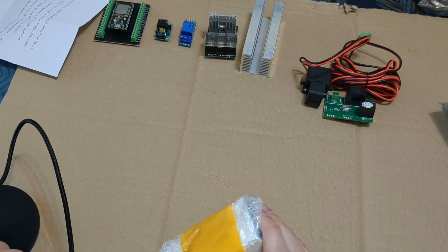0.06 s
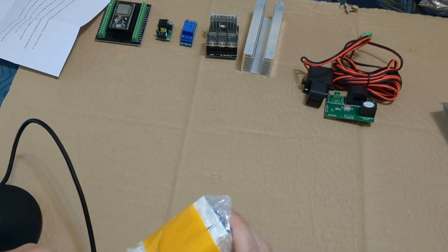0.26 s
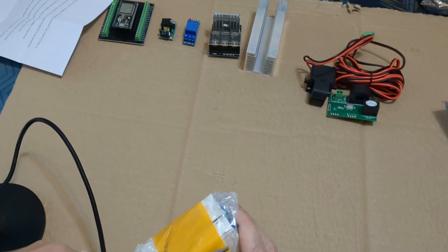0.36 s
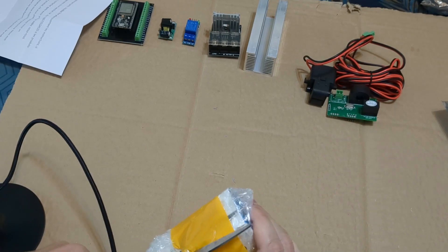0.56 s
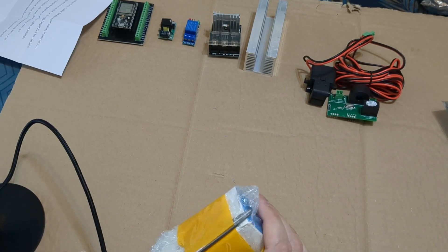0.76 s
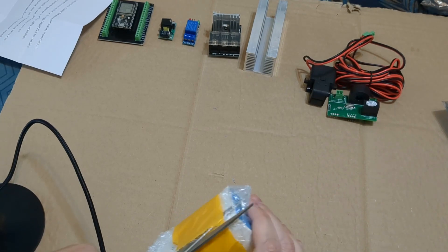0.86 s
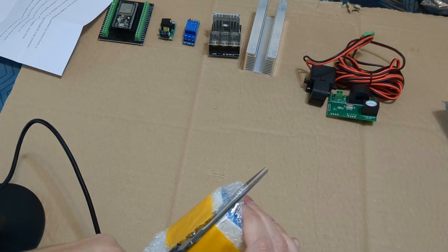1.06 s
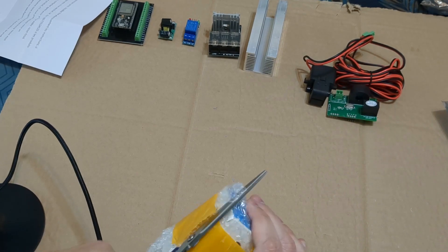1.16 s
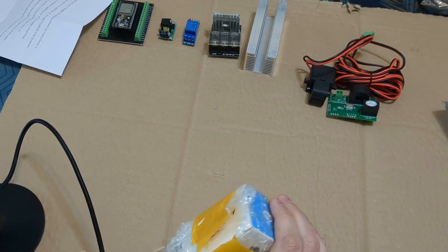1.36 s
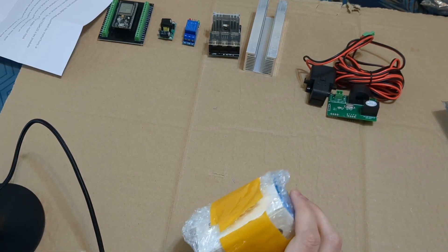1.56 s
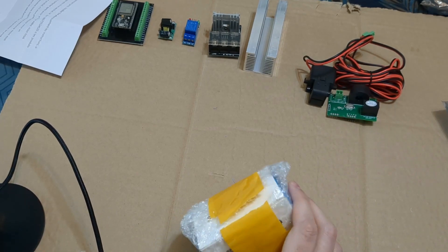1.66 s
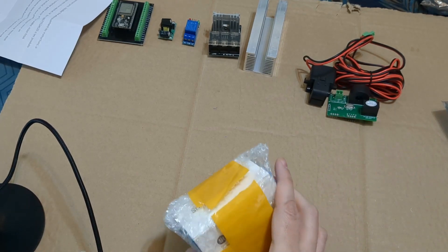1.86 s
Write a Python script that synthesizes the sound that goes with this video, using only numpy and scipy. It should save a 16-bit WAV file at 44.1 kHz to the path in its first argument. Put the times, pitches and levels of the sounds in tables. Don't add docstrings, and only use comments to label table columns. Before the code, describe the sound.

Close, dry stereo sound of a plastic-wrapped parcel being handled indoors: bright rustling, one strong early snap, more crisp crackles and a short swelling crinkle, then sparse ticks as the hands come to rest over soft rumble.

```python
import sys
import numpy as np
from scipy import signal
from scipy.fft import rfft, irfft, next_fast_len
from scipy.io import wavfile
from scipy.ndimage import uniform_filter1d, map_coordinates

SR = 44100
rng = np.random.default_rng(int(sys.argv[2]) if len(sys.argv) > 2 else 0)


def generate_wav(signal):
    frames = np.transpose(np.atleast_2d(signal))
    scaled = np.clip(frames, -1, 1) * 32767
    pcm = np.round(scaled).astype(np.int16)
    wavfile.write(sys.argv[1], SR, pcm)


def natural_amplitude(level_db):
    exponent = np.asarray(level_db, float) / 20
    return 10 ** exponent


N = 83790
T = np.arange(N) / SR

# time in seconds, peak of the film, of the outer sheet, of the tape and of the box, all in dB.
SNAPS = [(0.1576, -44, -48, -44.5, -73), (.202, -12, -15, -16.5, -30.5), (0.2089, -34, -27, -40, -41),
         (0.284, -44, -44, -28, -58), (0.3301, -34, -33, -32.5, -43), (0.4592, -48, -29, -60, -64),
         (.583, -20, -22.5, -31.5, -48.5), (0.5872, -20, -23, -34.5, -59.5),
         (0.5907, -38, -29.5, -42, -50.5), (.63, -26, -30, -39, -62), (0.6971, -36, -45, -45, -62),
         (0.7235, -43, -31, -41.5, -60), (0.7267, -28.5, -40, -46, -51), (.781, -39, -53, -42, -58),
         (0.8486, -34, -48, -45, -54.5), (0.861, -44, -49, -52, -45.5), (0.8716, -22, -35, -51, -40),
         (0.941, -29, -55, -39, -55), (0.999, -42, -49, -43, -66), (1.043, -28, -33.5, -37.5, -36.5),
         (1.061, -43, -53, -48, -57), (1.0734, -36, -45, -44.5, -57), (1.084, -32, -47, -65, -59),
         (1.292, -46, -38, -39.5, -45.5), (1.357, -28.5, -47, -31, -41.5), (1.359, -25, -46, -35, -43.5),
         (1.4087, -50, -48, -48.5, -62), (1.5127, -35.5, -48, -50.5, -65), (1.7, -52, -53, -57, -66.5),
         (1.7148, -55, -52, -53.5, -67)]

SNAP_S, TICK_S, PUSH_S = 0.00036, 0.00033, 0.00017
TAPE_PUSH_S = PUSH_S / 5


def rms_one(x):
    return x / np.sqrt(np.mean(x ** 2) + 1e-20)


def drift(rate_hz):
    r = np.exp(-2 * np.pi * rate_hz / SR)
    run_in = 4000
    noise = rng.standard_normal(N + run_in)
    return rms_one(signal.lfilter([1], [1, -2 * r, r * r], noise)[run_in:])


def colour(x, points):
    hz, db = np.transpose(points)
    f = np.maximum(np.fft.rfftfreq(N, 1 / SR), 1)
    low_fall_db = 20 * np.maximum(np.log2(hz[0] / f), 0)
    gain = natural_amplitude(np.interp(np.log(f), np.log(hz), db) - low_fall_db)
    return irfft(rfft(x) * gain, N) / np.sqrt(np.mean(gain ** 2))


def pole(x, hz, width_hz):
    r, w = np.exp(-np.pi * width_hz / SR), 2 * np.pi * hz / SR
    edge = (1 - r * r) / 2
    return signal.lfilter([edge, 0, -edge], [1, -2 * r * np.cos(w), r * r], x + 1e-18)


def band(x, edges_hz):
    return signal.sosfilt(signal.butter(2, edges_hz, "band", fs=SR, output="sos"), x)


def lean(x, db):
    return x * natural_amplitude(db * np.array([[1], [-1]]))


def background():
    # time in seconds, level in dB.
    rumble = [
        (0.0, -68),
        (0.116, -72.5),
        (0.344, -57),
        (0.46, -74),
        (1.338, -91),
        (1.354, -73),
        (1.524, -96),
        (1.9, -74.5),
    ]
    # frequency in Hz, density in dB per Hz.
    air_spectrum = [(24, -50), (40, 2), (422, -4.5), (1040, -5), (1680, -9), (4570, -5), (10400, -7.5),
                    (16000, -26)]
    likeness = 0.39
    low = band(rng.standard_normal((2, N)), (51, 160))
    low[1] = likeness * low[0] + np.sqrt(1 - likeness ** 2) * low[1]
    s, db = np.transpose(rumble)
    rumble_db = np.interp(T, s, db) + 8.5 + 2.0 * drift(2)
    air = colour(rng.standard_normal((2, N)), air_spectrum)
    return natural_amplitude(rumble_db) * rms_one(low) + natural_amplitude(-63) * air


def handling(column):
    # time in seconds, film rustle in dB, tape and box in dB,
    # loose outer sheet in dB against the film.
    hands = [(0, -55, -59.5, 0), (.19, -52, -54.5, 1), (.31, -52.5, -49, 13), (.42, -51, -51.5, 0),
             (.56, -59.5, -57, 4), (.62, -51, -53, 2), (.82, -58, -58.5, -2.5), (.9, -48, -51, -25),
             (1.131, -50, -56.5, -41), (1.232, -50.5, -55.5, -19), (1.42, -58, -51, -1),
             (1.52, -60.5, -61.5, -5), (1.63, -66, -67, -22), (1.72, -58, -60.5, -5), (1.9, -74, -69, 2)]
    rows = np.transpose(hands)
    return np.interp(T, rows[0], rows[column])


def grains():
    grains_per_s, grain_spread_db = 4900, -0.5
    crackles_per_s, crackle_spread_db, crackle_db = 310, 5.5, -11.5
    likeness = 0.12
    happens = rng.random(N) < grains_per_s / SR
    size = natural_amplitude(grain_spread_db * np.minimum(rng.exponential(1, N), 4)) * happens
    size = np.sqrt(signal.lfilter([1], [1, -0.8], size ** 2) + 0.3)
    size = size * natural_amplitude(2.65 * drift(90) + 1.0 * drift(31))
    happens = rng.random(N) < crackles_per_s / SR
    lone = natural_amplitude(crackle_spread_db * np.minimum(rng.exponential(1, N), 3)) * happens
    mid, side, spit = rng.standard_normal((3, N))
    side = side * np.array([[1], [-1]])
    dense = rms_one(size * (np.sqrt(1 + likeness) * mid + np.sqrt(1 - likeness) * side))
    crackle = rms_one(signal.lfilter([1], [1, -0.93], lone) * spit)
    return dense + natural_amplitude(crackle_db) * crackle


def effort(column, steady_db):
    # start in seconds, length in seconds, release in seconds.
    squeezes = [(0.203, 0.017, 0.024), (0.2497, 0.025, 0.013), (0.28, 0.0082, 0.0089),
                (0.327, 0.0069, .012), (0.444, 0.09, .008), (0.695, 0.0066, 0.012), (.716, 0.011, 0.009),
                (0.857, 0.02, 0.014), (0.933, 0.02, .012), (0.992, 0.017, 0.024), (1.046, 0.01, 0.014),
                (1.059, 0.0071, 0.0033), (1.076, 0.003, 0.0026), (1.0803, 0.0071, 0.009),
                (1.243, 0.094, 0.027), (1.359, 0.006, 0.016), (1.405, 0.0065, 0.024)]
    # film, tape, box and outer sheet, all in dB.
    squeeze_db = [(-39, -32, -36, -39.5), (-31, -37.5, -43.5, -30.5), (-47, -33.5, -51, -52),
                  (-45, -39, -45, -43), (-59, -45.5, -60.5, -46.5), (-44.5, -46.5, -60, -53),
                  (-42.5, -45.5, -55, -47), (-42.5, -49, -42, -49), (-44, -46.5, -50, -67),
                  (-53, -50, -49.5, -62), (-46, -41, -42.5, -64), (-38, -45.5, -46.5, -63),
                  (-35, -43, -60, -48), (-33.5, -50, -50, -64), (-44, -47.5, -56, -42),
                  (-35.5, -41, -42, -50), (-63, -49, -49, -52)]
    t = T[::16]
    power = natural_amplitude(2 * steady_db[::16])
    for (start, hold, release), dbs in zip(squeezes, squeeze_db):
        attack_s = 0.043 if hold > 0.05 else 0.00038
        rise = np.clip((t - start) / attack_s, 0, 1)
        fall = np.exp(-np.maximum(t - start - hold, 0) / max(release, 0.001))
        power = power + (natural_amplitude(dbs[column]) * rise * fall) ** 2
    return np.interp(T, t, np.sqrt(power))


def spits(count, length_s, noisy):
    n = np.arange(300) / (SR * length_s)
    shape = np.sqrt(n) * np.exp(-n)
    hiss = rfft(shape * rng.standard_normal((count, 300)))
    local_power = uniform_filter1d(np.abs(hiss) ** 2, size=15, axis=1)
    hiss = irfft(hiss / np.sqrt(local_power + 1e-9), 300)
    hiss = hiss * (n < 6) / hiss.std(axis=1, keepdims=True) * shape.std()
    return (1 - noisy) * shape + noisy * hiss


def spits_at_ports(count, length_s, noisy):
    likeness = 0.6
    shared = np.sqrt(likeness) * spits(count, length_s, noisy)
    return [shared + np.sqrt(1 - likeness) * spits(count, length_s, noisy) for _ in range(2)]


def bursts(times, dbs, pulses, length_s):
    give_s = 0.0009
    out = np.zeros(N + SR)
    for s, db, p in zip(times, dbs, pulses):
        i = int((s + give_s) * SR)
        out[i:i + len(p)] += natural_amplitude(db) * p * np.sqrt(length_s * SR / 4 / np.sum(p ** 2))
    return out[:N]


def film():
    # frequency in Hz, density in dB per Hz.
    film_spectrum = [(4000, -8.5), (6200, -15.5), (8000, -8.5), (11500, 1.5), (13500, -5), (15500, -8),
                     (15900, -12), (16300, -43)]
    at, snap_db = np.transpose(SNAPS)[[0, 1]]
    rustle = colour(effort(column=0, steady_db=handling(1)) * grains(), film_spectrum)
    pair = spits_at_ports(len(at), SNAP_S, noisy=0.9)
    crack = np.array([bursts(at, snap_db + 8.5, spit, SNAP_S) for spit in pair])
    return rustle + band(crack, (3640, 15200))


def outer_sheet():
    at, snap_db = np.transpose(SNAPS)[[0, 2]]
    steady_db = handling(1) + handling(3) + 2
    rustle = pole(effort(column=3, steady_db=steady_db) * grains(), 5980, 4800)
    pair = spits_at_ports(len(at), TICK_S, noisy=1)
    crack = np.array([bursts(at, snap_db + 3.5, spit, TICK_S) for spit in pair])
    sheet = rustle + band(crack * 4, (4710, 6820))
    return lean(sheet, np.linspace(2.5, -4.5, N))


def tape():
    # frequency in Hz, width in Hz, level in dB.
    tape_modes = [(1453, 644, -3.5), (2212, 483, 2), (2516, 380, 3.5), (3540, 1160, -0.5),
                  (4970, 5100, -11.5)]
    at, snap_db = np.transpose(SNAPS)[[0, 3]]
    drive = effort(column=1, steady_db=handling(2)) * grains()
    drive = drive + bursts(at, snap_db + 19.5, spits(len(at), TAPE_PUSH_S, 0.074), TAPE_PUSH_S)
    rung = 0
    for k, (hz, width_hz, db) in enumerate(tape_modes):
        rung = rung + natural_amplitude(db) * (-1) ** k * pole(drive, hz, width_hz)
    dull = signal.butter(4, 4800, fs=SR, output="sos")
    return lean(signal.sosfilt(dull, 3.23 * rung), 1.5)


def box():
    # frequency in Hz, level in dB, time to decay by 60 dB in seconds.
    box_modes = [(216, -12.5, 0.017), (324, -6, 0.048), (369, -9.5, 0.046), (424, -3, 0.021),
                 (590, -6, 0.021), (680, -9, 0.038), (770, -13, 0.0033)]
    likeness = 0.88
    at, snap_db = np.transpose(SNAPS)[[0, 4]]
    touch = grains()
    touch = likeness * touch.mean(0) + (1 - likeness) * touch
    drive = effort(column=2, steady_db=handling(2) - 9) * touch
    drive = drive + bursts(at, snap_db + 8.5, spits(len(at), PUSH_S, 0), PUSH_S)
    rung = 9 * sum(natural_amplitude(db) * pole(drive, hz, np.log(1000) / np.pi / t60) for hz, db, t60 in box_modes)
    return lean(band(rung, [210, 1000]), 1.3)


def ticks():
    # time in seconds, peak in dB, pitch in Hz, width in Hz.
    creases = [(.0065, -37.5, 10800, 3200), (0.0534, -28, 10400, 6000), (0.068, -36, 7800, 3200),
               (0.093, -33, 7900, 3200), (0.1296, -31, 8950, 3200), (.1755, -33, 12000, 3200),
               (0.2513, -33, 11400, 3200), (0.2839, -19, 1810, 500), (.3686, -24.5, 11900, 7000),
               (.395, -38, 11700, 3200), (0.4057, -34, 11400, 3220), (.4695, -38, 11100, 2500),
               (0.494, -31, 6400, 5000), (.5437, -28, 13200, 6500), (0.571, -50, 9500, 2500),
               (.6375, -42, 11000, 4000), (.6696, -39, 9960, 3200), (0.7676, -36, 7900, 3200),
               (0.8238, -33.5, 4450, 3980), (.854, -30, 11500, 3200), (.9108, -41, 11100, 3200),
               (1.0114, -40, 10500, 3200), (1.066, -32, 11900, 4000), (1.0723, -28, 11900, 3000),
               (1.0742, -38, 2500, 1000), (1.077, -21, 12300, 1500), (1.109, -29, 12800, 3800),
               (1.1144, -30, 10000, 4040), (1.149, -44, 13500, 3200), (1.1594, -29.5, 12100, 5000),
               (1.1706, -31, 13200, 4500), (1.2145, -32, 11300, 3200), (1.262, -26, 11900, 3230),
               (1.304, -31, 10000, 5930), (1.3945, -37, 13000, 3180), (1.411, -34, 4000, 1200),
               (1.487, -41, 11430, 3220), (1.6679, -31, 11600, 3200), (1.673, -44, 13400, 3240),
               (1.8314, -47, 4970, 3230), (1.8457, -43, 7700, 3200), (1.8697, -47, 13000, 6000)]
    at, peak_db, pitch, width = np.transpose(creases)
    laid = []
    for spit in spits_at_ports(len(at), TICK_S, noisy=1):
        rung = []
        for p, hz, width_hz in zip(spit, np.minimum(pitch, 15500), 1.46 * width):
            twice = pole(pole(p, hz, width_hz), hz, width_hz)
            rung.append(twice + natural_amplitude(-24) * p)
        laid.append(bursts(at, peak_db + 5, rung, SNAP_S))
    return signal.sosfilt(signal.butter(2, 1000, "high", fs=SR, output="sos"), np.array(laid))


def rub():
    # time in seconds, level in dB, pitch of the rasp in Hz.
    strokes = [
        (0.426, -64, 2300),
        (0.441, -53.5, 2400),
        (.46, -48, 2450),
        (0.484, -49, 2900),
        (.51, -53, 2900),
        (0.536, -56, 2500),
        (.548, -63, 2400),
    ]
    s, db, hz = np.transpose(strokes)
    phase = 2 * np.pi * np.cumsum(np.interp(T, s, hz)) / SR
    a, b, c, d = [drift(170) for _ in range(4)]   # Hz, the width of the rasp
    overtone_db = 3.5 - 126 * np.maximum(T - s[2], 0)
    overtones = natural_amplitude(overtone_db) * (c * np.cos(2.2 * phase) + d * np.sin(1.5 * phase))
    rasp = a * np.cos(phase) + b * np.sin(phase)
    level_db = np.interp(T, s, db, -120, -120) + 1.4 * drift(81)
    return lean(natural_amplitude(level_db) * (rasp + overtones), 1.5)


def ports(x):
    lead = np.linspace(6.13, 0.0, N)
    late = map_coordinates(x[1], [np.arange(N) - lead], order=3)
    return np.array([x[0], late])


def room(x):
    t60_s, wall_cut_hz = 0.53, 6460
    size = next_fast_len(N + SR // 2)
    w = 2 * np.pi * np.fft.rfftfreq(size, 1 / SR)
    wall = 1 + 1j * w / (2 * np.pi * wall_cut_hz)
    out = []
    for delays_s in rng.uniform(0.004, 0.038, (2, 6)):
        loops = [natural_amplitude(-60 * d / t60_s) * np.exp(-1j * w * d) / wall for d in delays_s]
        response = sum(g / (1 - g) for g in loops)
        out.append(irfft(rfft(x, size) * response, size)[:N])
    return np.array(out)


def scene():
    parcel = film() + outer_sheet() + tape() + box() + ticks() + rub()
    return ports(parcel) + natural_amplitude(-19) * room(parcel.mean(0)) + background()


def top_cut(x):
    return signal.sosfilt(signal.butter(12, 16970, fs=SR, output="sos"), x)


def record(dry):
    dry = signal.sosfilt(signal.butter(2, 45, "high", fs=SR, output="sos"), dry)
    dry = signal.sosfilt(signal.cheby2(10, 50, 16900, fs=SR, output="sos"), dry)
    return top_cut(dry)


dry = scene()
out = record(dry)
generate_wav(out)
```